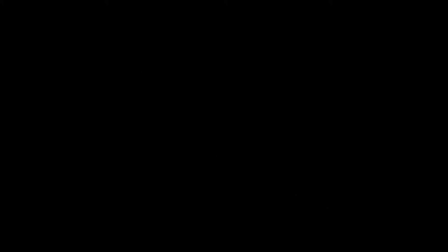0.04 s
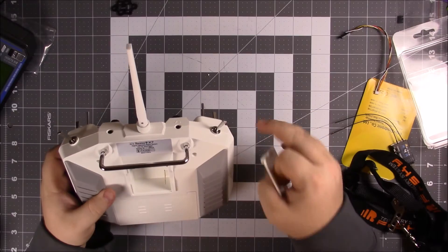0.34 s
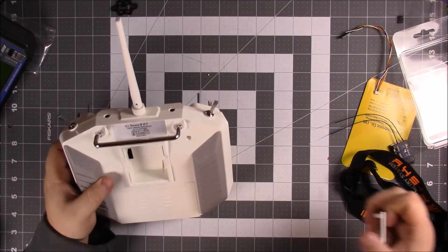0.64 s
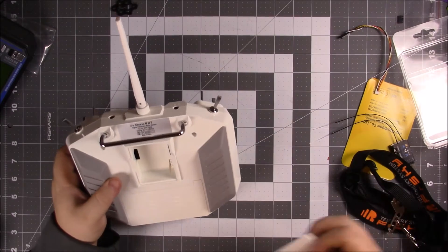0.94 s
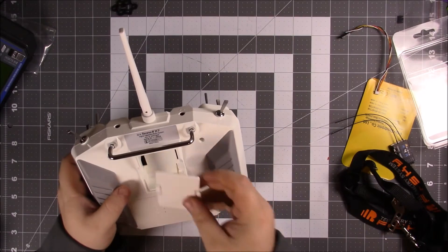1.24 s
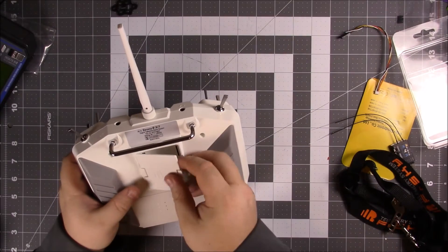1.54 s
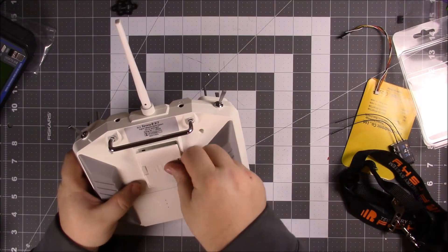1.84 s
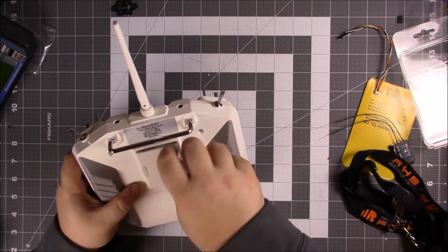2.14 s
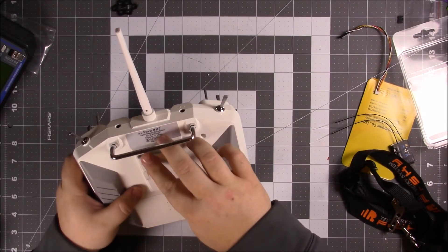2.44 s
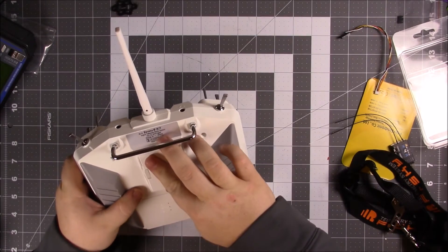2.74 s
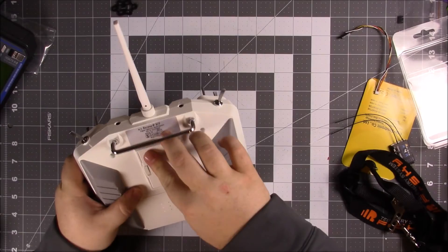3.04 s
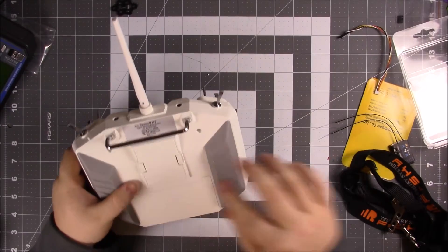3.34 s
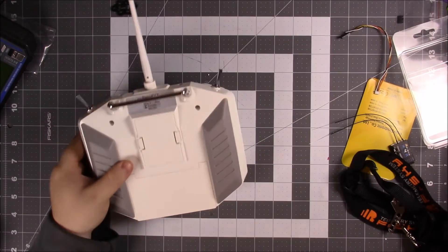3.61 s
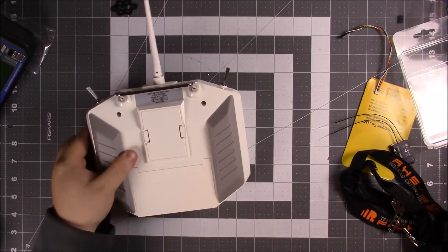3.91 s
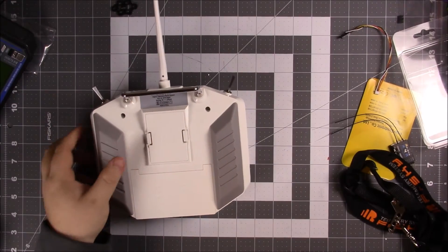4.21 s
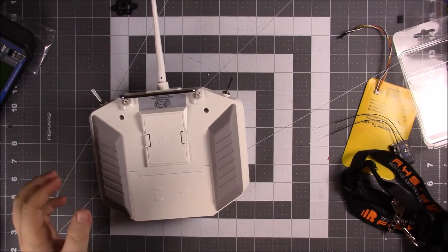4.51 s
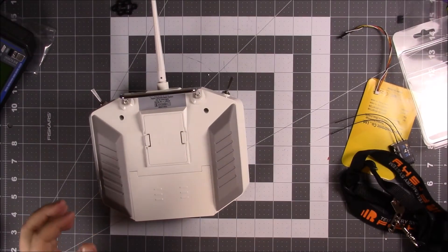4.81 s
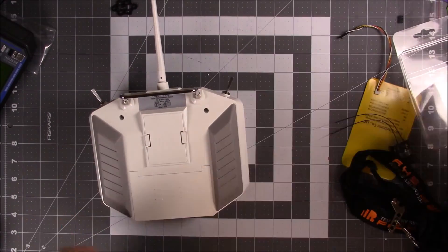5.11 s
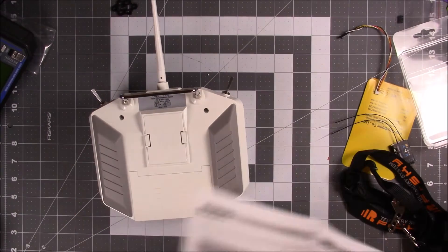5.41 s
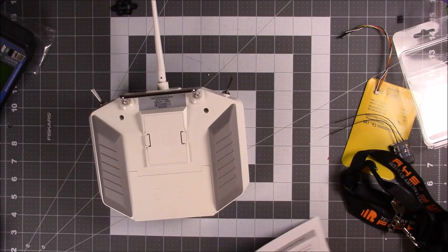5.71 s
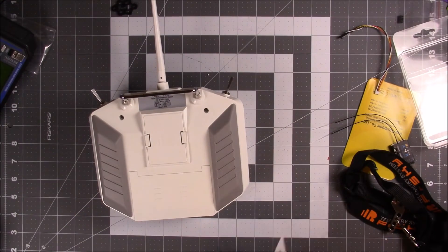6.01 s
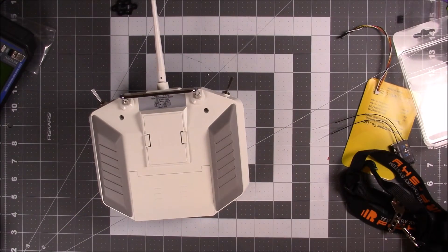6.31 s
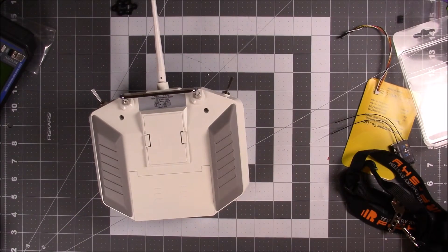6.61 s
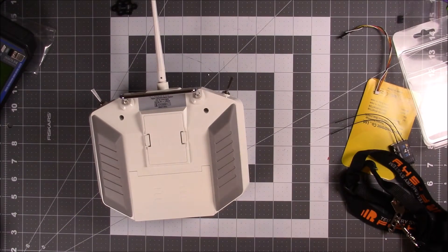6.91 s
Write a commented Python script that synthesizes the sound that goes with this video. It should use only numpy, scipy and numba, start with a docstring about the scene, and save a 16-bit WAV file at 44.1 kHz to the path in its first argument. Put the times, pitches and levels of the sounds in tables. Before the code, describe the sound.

Light plastic taps lead to one loud rattling snap, then soft knocks, a sleeve swish and crinkling packaging in a humming room.

```python
"""A plastic cover snaps home in the back of a handheld radio case, after tapping and catching.
Each impact excites the damped modes of panel, shell and cavity; loose parts rattle after the snap.
The case settles on a table mat, a sleeve slides away with friction noise, and a thin plastic package
buckles and crackles as it is picked up. Mains hum and a fan fill the small room.
One close stereo microphone feeds a fast limiter."""
import sys
import numpy as np
from scipy import signal
from scipy.fft import rfft, irfft, next_fast_len
from scipy.io import wavfile
from scipy.ndimage import uniform_filter1d, minimum_filter1d
from numba import njit

SR = 44100
rng = np.random.default_rng(int(sys.argv[2]) if len(sys.argv) > 2 else 0)


def transcribe(signal):
    """Save signal, clipped to [-1, 1], as a 16-bit WAV file at the path in sys.argv[1]."""
    frames = np.atleast_2d(signal).T
    limited = np.clip(frames, -1, 1)
    pcm = np.round(limited * 32767).astype(np.int16)
    wavfile.write(sys.argv[1], SR, pcm)


N = 315403
TIME = np.arange(N) / SR
BLOW_TIME = np.arange(8192) / SR


# modes of the hollow case and its metal parts: (frequency [Hz], bandwidth [Hz], gain [dB])
HOLLOW_MODES = [(379, 19, 7), (430, 5.3, -2.5), (466, 17, 3), (518, 8, 1.5), (645, 9.4, -1.5),
                (753, 12, -13.5), (1292, 22, -12.5), (1592, 14, -15.5), (255, 22, -6), (3890, 32, -1),
                (7200, 45, -17), (13800, 60, -16)]
# impacts of loose parts inside: (time [s], knock [dB], buzz [dB], chatter [dB])
LOOSE_PARTS = [(3.0956, -16, -41, -35), (3.1085, -21.5, -24, -34), (3.1145, -22.5, -24, -28),
               (3.121, -23, -27.5, -24), (3.127, -20, -36, -25), (3.137, -26, -45, -32.5)]

def snap(latch_s=3.0821, latch_ms=1.1):
    """Impulse excitation: the latch cracks home, the hollow case rings freely and loose parts rattle."""
    out = np.zeros(N)
    add(out, latch_s, case_blow(panel_hz=467, ping_hz=3560, thud_db=-14.5, clack_db=-11.5, tick_db=-15,
                                ms=latch_ms, ping_db=-12.5, wall_db=-26))
    ring = resonate(np.pad(contact(0.15), (0, SR // 3)), HOLLOW_MODES)
    crack = band(contact(latch_ms), 12000, 18000)
    add(out, latch_s, burst(ring, -15))
    add(out, latch_s, burst(crack, -21))
    for s, knock_db, buzz_db, chatter_db in LOOSE_PARTS:
        force = contact(1.5)
        knock = band(resonate(force, [(470, 50, -2), (634, 44, -8.5), (752, 45, -7.5)]), 320, 1700)
        buzz = band(resonate(force, [(3890, 130, 0)]), 3000, 5000, order=1)
        shell = dense_modes(force, 0.071) + unit(resonate(force, SHELL_MODES))
        chatter = band(shell, 1600, 3100, order=1)
        add(out, s, burst(knock, knock_db) + burst(buzz, buzz_db) + burst(chatter, chatter_db))
    return out


# impacts of the cover on the case: (time [s], panel pitch [Hz], edge ping [Hz], thud [dB], clack [dB],
# tick [dB], contact time [ms], ping [dB], back wall [dB])
COVER_TAPS = [(1.4133, 582, 3560, -33, -34, -44.5, 1.5, -39, -35),
              (1.517, 566, 1480, -41, -58, -71, 1.2, -62, -47),
              (1.5552, 580, 2770, -34, -43, -62, 0.34, -43.5, -43),
              (1.556, 406, 3500, -41, -47, -69, .5, -43.5, -50),
              (1.577, 530, 1570, -40, -49, -62, 3.6, -55, -44.5),
              (1.6488, 560, 8700, -32, -36, -43, 1.35, -40, -41),
              (1.801, 410, 1120, -38, -46.5, -62, 6, -51, -45.5),
              (1.824, 427, 4400, -37, -48, -66, 1.66, -54.5, -45),
              (1.84, 393, 3200, -34.5, -52, -72, 2, -58, -50),
              (1.907, 550, 3220, -45.5, -55, -70, 2.2, -53, -55),
              (2.135, 420, 8000, -41.5, -50.5, -55.5, 7.7, -66, -54),
              (2.203, 543, 8750, -36, -42, -49, 1.27, -46, -48),
              (2.2109, 448, 1590, -39.5, -44, -53, 0.56, -50, -49),
              (2.586, 445, 1400, -45, -67, -80, 1.04, -66, -62),
              (2.707, 434, 1750, -36, -49, -71, 4.8, -42, -39),
              (2.715, 373, 3220, -29.5, -30.5, -37, 0.62, -29.5, -27),
              (2.808, 377, 1530, -37, -34, -53, 0.91, -36, -38),
              (2.8108, 385, 4425, -25, -28, -40.5, 0.8, -36.5, -28.5),
              (2.9049, 398, 1330, -35, -54, -82, 0.62, -56, -57)]

def taps(cavity_hz=385, detune_db_per_octave=10):
    """Coupled resonance: the cover taps, and the enclosed air answers most to a panel near its pitch."""
    out = np.zeros(N)
    for s, panel_hz, ping_hz, thud_db, *blow in COVER_TAPS:
        add(out, s, case_blow(panel_hz, ping_hz, thud_db, *blow))
        coupling_db = -9 - detune_db_per_octave * abs(np.log2(panel_hz / cavity_hz))
        cavity = band(resonate(contact(0.18), [(cavity_hz, 40, 0)]), 340, 470)
        add(out, s, burst(cavity, thud_db + coupling_db))
    return near_reflection(out)


# modes of the case's shell: (frequency [Hz], bandwidth [Hz], gain [dB])
SHELL_MODES = [(962, 22, 3), (1125, 60, 0.5), (1306, 56, 3.5), (1621, 84, 2.5), (2026, 99, -5.5),
               (2697, 210, -3.5), (3080, 360, -4), (3520, 610, -3), (5680, 300, -7), (5980, 100, 1),
               (7300, 880, -1.5), (8900, 250, 0.5), (10200, 300, 0)]
# modes of its back wall: (frequency [Hz], bandwidth [Hz], gain [dB])
BACK_WALL_MODES = [(747, 57, 3), (936, 40, 0), (1091, 55, -2), (1325, 37, -5), (1642, 55, -13)]

def case_blow(panel_hz, ping_hz, thud_db, clack_db, tick_db, ms, ping_db, wall_db):
    """Modal superposition: the panel thuds, wall rings, edge pings, shell clacks and contact ticks."""
    force = contact(ms)
    panel = unit(resonate(force, [(panel_hz, 48, 0), (panel_hz * 1.446, 110, -7)]))
    body = unit(band(dense_modes(force, 0.23), 180, 800, order=1))
    shell = unit(resonate(force, SHELL_MODES)) + undb(-5) * dense_modes(force, 0.075)
    shell += undb(-9) * unit(force)
    ping = band(resonate(force, [(ping_hz, 260, 0)]), 0.8 * ping_hz, 1.2 * ping_hz, order=1)
    wall = band(resonate(force, BACK_WALL_MODES), 660, 2600)
    thud = band(panel + undb(-6) * body, 0.55 * panel_hz, 1200)
    # a blow with little tick is soft, so its clack is dull too
    cutoff_hz = np.clip(8000 * 2 ** ((tick_db - clack_db) / 14), 1500, 12000)
    clack = band(band(shell, 1050, 4900, order=3), 100, cutoff_hz)
    tick = band(shell, 5200, 17000)
    return (burst(thud, thud_db) + burst(wall, wall_db) + burst(clack, clack_db)
            + burst(ping, ping_db) + burst(tick, tick_db))


# impacts on the mat: (time [s], panel pitch [Hz], thud [dB], clack [dB], table [dB], contact time [ms])
MAT_KNOCKS = [(3.7414, 267, -35, -45.5, -40.5, 0.5), (3.7791, 315, -41.5, -46, -46, 0.9),
              (3.785, 520, -41.5, -49, -56, 2.8), (3.988, 278, -44, -51, -51, 0.73),
              (4.006, 272, -43, -48, -42, 1.36), (4.044, 237, -40, -62, -43.5, 2.04),
              (4.058, 169, -46, -60, -43, 1.5), (4.128, 253, -42.5, -51.5, -51, 2.7),
              (4.3377, 336, -50, -45.5, -61, 0.43), (4.442, 348, -55, -51, -70, 0.69)]
# modes of the table: (frequency [Hz], bandwidth [Hz], gain [dB])
TABLE_MODES = [(91, 20, -4), (154.4, 11.3, 3), (244, 30, -8.5), (537, 28, -7)]

def settling():
    """Structure-borne sound: the case rocks on the soft mat and drives the table's low modes."""
    out = np.zeros(N)
    for s, panel_hz, thud_db, clack_db, table_db, ms in MAT_KNOCKS:
        add(out, s, case_blow(panel_hz, ping_hz=1490, thud_db=thud_db, clack_db=clack_db, ms=ms,
                              tick_db=clack_db - 26.5, ping_db=clack_db - 1, wall_db=clack_db - 7))
        thump = band(resonate(contact(ms), TABLE_MODES), 60, 880)
        add(out, s, burst(thump, table_db))
    return out


# buckles of the package: (time [s], facet pitch [Hz], clack [dB], tick over clack [dB], contact time [ms])
BUCKLES = [(4.783, 1510, -46.5, -16, 7), (5.177, 1260, -34, -9, 2.1), (5.188, 3720, -33, -14.5, 2.06),
           (5.5575, 1900, -44, -4, .8), (5.566, 1900, -36.5, -27, 4), (5.576, 1800, -34, -31, 1.5),
           (5.585, 2290, -42, -1.5, 3.3), (5.679, 2760, -42, -9, 1.5), (5.691, 1680, -34.5, -25, 1.3),
           (5.708, 2600, -44, -2.5, 0.71), (5.7135, 2450, -32.5, -13, 0.35), (5.745, 3050, -23.5, -5, 0.2),
           (5.809, 970, -40.5, -28, 1.2), (5.816, 1290, -41.5, -17, 2), (5.968, 3970, -46, -6.5, 2.1),
           (6.053, 3630, -48, 0.5, 0.15), (6.1147, 3500, -53, 1, 0.8), (6.2238, 3680, -50, 2, 0.35),
           (6.2518, 3500, -42, 1, 3), (6.2666, 3370, -43, 5.5, 0.62), (6.2807, 3400, -32, 1, 0.49),
           (6.284, 2240, -34.5, -9, 3.5), (6.628, 2100, -47.5, -8.5, 1.8), (6.99, 1960, -47, -23.5, 1.7),
           (7.006, 2070, -46, -24.5, 1.5), (7.136, 3860, -47, -13, 0.58)]
# modes of its thin wall: (frequency [Hz], bandwidth [Hz], gain [dB])
PACKAGE_MODES = [(656, 88, 4), (972, 48, 12), (1118, 38, 5.5), (1350, 83, 8), (1583, 27, -3.5),
                 (2580, 140, 2), (4070, 140, -3), (4900, 600, 3), (6940, 1400, 12.5), (9380, 260, 1.5),
                 (12000, 3600, 12)]

def buckling():
    """Snap-through buckling: each facet of the package flips and pings; the damped wall dies at once."""
    out = np.zeros(N)
    for s, facet_hz, clack_db, bright_db, ms in BUCKLES:
        force = contact(ms)
        wall = unit(resonate(force, PACKAGE_MODES)) + undb(-1) * dense_modes(force, 0.038)
        wall += undb(-3) * unit(force)
        facet = unit(band(force, facet_hz - 225, facet_hz + 225))
        clack = unit(band(wall, 950, 5200, order=3)) + undb(-3) * facet
        thud = band(wall, 420, 1003)
        thud_db = clack_db - 8.5 - 0.2 * bright_db + 2.5 * np.log2(ms)  # duller, longer pushes thud more
        tick = band(wall, 6800, 11700)
        add(out, s, burst(thud, thud_db) + burst(clack, clack_db) + burst(tick, clack_db + bright_db))
    return out


# the package is dragged and turned: (peak time [s], swell [s], fade [s], scrape gain [dB], hiss gain [dB])
DRAGS = [(5.3, 0.11, 0.28, -53.5, -56), (5.405, 0.038, 0.1, -45, -46.5), (5.57, 0.056, 0.054, -40, -43),
         (5.685, 0.056, 0.075, -39, -42), (5.795, 0.039, 0.1, -36.5, -44.5),
         (5.99, 0.091, 0.095, -59, -51.5), (6.165, 0.076, 0.022, -50, -47.5),
         (6.28, 0.021, 0.033, -37.5, -39), (6.655, 0.042, 0.14, -51.5, -50.5),
         (6.99, 0.021, 0.021, -43, -52), (7.12, 0.071, 0.03, -68, -50)]
# dull and bright friction spectra, shared with the sleeve: (frequency [Hz], relative level [dB])
SCRAPE_SPECTRUM = [(40, -32), (130, -33), (250, -3.5), (450, -5.5), (800, -3.5), (1500, 0), (2400, -5),
                   (3400, -10.5), (6000, -49)]
HISS_SPECTRUM = [(1500, -33), (2700, 1.5), (3500, 0), (4400, -2), (5300, -4), (7000, -7), (8800, -9),
                 (11500, -10.5), (14000, -19), (16000, -29)]

def dragging():
    """Forced vibration: friction drives the package wall while the smooth plastic hisses and crackles."""
    scrape_gain, hiss_gain = strokes(DRAGS)
    slips = friction(SCRAPE_SPECTRUM, grain_db=3, uneven_db=2, patchy_db=3)
    scrape = undb(-4) * slips + undb(-5) * unit(resonate(slips, PACKAGE_MODES))
    hiss = friction(HISS_SPECTRUM, grain_db=1, uneven_db=2.6, patchy_db=1.5)
    sheen = friction([(2000, -20.5), (5000, 7), (11000, -10), (16000, -7)],
                     grain_db=-2, uneven_db=6, patchy_db=-1.5)
    treble = undb(-1) * hiss + undb(-9) * sheen + undb(-16.5) * crackle()
    return scrape * scrape_gain + treble * hiss_gain


def crackle(buckles_per_s=180):
    """Poisson process: tiny buckles of equal strength excite the package wall at random times."""
    clicks = (rng.random(N) < buckles_per_s / SR).astype(float)
    force = signal.fftconvolve(clicks, contact(0.46))[:N]
    return unit(band(unit(force) + 0.35 * unit(resonate(force, PACKAGE_MODES)), 1500, 14500))


# strokes of the sleeve on the mat: (peak time [s], swell [s], fade [s], scrape [dB], hiss [dB])
SLEEVE_SLIDES = [(4.01, 0.12, 0.086, -59, -61.5), (4.15, 0.084, 0.042, -55, -54),
                 (4.31, 0.086, 0.076, -53, -55), (4.565, 0.077, 0.09, -47.5, -45),
                 (4.73, 0.089, 0.1, -51, -55), (4.96, 0.13, 0.14, -49.5, -54.5),
                 (5.105, 0.069, 0.024, -41.5, -41.5)]

def sleeve(speed_up_s=4.65, rise_hz_per_s=5100):
    """Sliding friction: cloth scrapes and hisses, and its weave whistles higher as the arm speeds up."""
    scrape_gain, hiss_gain = strokes(SLEEVE_SLIDES)
    scrape = friction(SCRAPE_SPECTRUM, grain_db=1.5, uneven_db=3, patchy_db=2.5) * scrape_gain
    hiss = friction(HISS_SPECTRUM, grain_db=1.5, uneven_db=3.5, patchy_db=2) * hiss_gain
    weave_hz = 6800 + rise_hz_per_s * np.clip(TIME - speed_up_s, 0, 0.42)
    whistle = weave(weave_hz, width_hz=2400) * undb(-5.5) * hiss_gain
    pressure = hiss_gain / hiss_gain.max()  # the ribbed cuff rasps only under pressure
    cuff_rasp = weave(4070, width_hz=1200) * undb(-40) * pressure ** 1.6
    return scrape + hiss + whistle + cuff_rasp


def weave(hz, width_hz):
    """Narrow-band noise: threads flick past an edge at a rate set by the speed of the cloth."""
    spread = unit(band(rng.standard_normal(N), 5.6, width_hz / 2))
    phase = 2 * np.pi * np.cumsum(hz * np.ones(N)) / SR
    return spread * np.sqrt(2) * np.cos(phase)


# fingers rub the cover: (peak time [s], swell [s], fade [s], level [dB])
SKIN_RUBS = [(.25, 0.075, 0.037, -54.5), (.52, 0.045, 0.035, -53.5), (.97, 0.037, 0.15, -56),
             (1.84, 0.085, 0.017, -56), (2.25, 0.012, .04, -54), (2.41, 0.027, 0.016, -56.5)]
# plastic creaks between the fingers: (time [s], pitch [Hz], level [dB], contact time [ms])
CREAKS = [(0.303, 7200, -50, 7.8), (0.866, 7660, -54, 2.7), (0.944, 11000, -58, 4),
          (1.174, 12000, -61, 1.6), (3.935, 3800, -58, 2)]

def fingers():
    """Friction and resonance: skin brushes the small cover, which creaks faintly now and then."""
    rub = friction([(1500, -6), (4000, -6.5), (7000, -10.5), (12000, -12.5), (16000, -30)],
                   grain_db=1.5, uneven_db=3, patchy_db=2.5)
    out = rub * strokes(SKIN_RUBS)[0]
    for s, hz, db, ms in CREAKS:
        force = dense_modes(contact(ms), 0.048)
        creak = force + unit(resonate(force, [(hz, 600, 0)]))
        add(out, s, burst(band(creak, 2000, 14000), db))
    return out


def near_reflection(x, delay_s=0.003012):
    """Comb filtering: a hard surface close by returns a duller echo, which hollows the tone."""
    out = x.copy()
    add(out, delay_s, undb(-10.5) * band(x, 40, 2500, order=1))
    return out


def room(x, wet_db=-12, low_t60=0.28, high_t60=0.19, first_echo_s=0.009):
    """Reverberation: the walls of a small room add a diffuse tail, weaker and shorter in the treble."""
    t = TIME[:SR // 2]
    low, high = rng.standard_normal((2, len(t)))
    tail = band(low, 120, 6500) * decay(t, low_t60)
    tail += undb(-5) * band(high, 7100, SR / 2) * decay(t, high_t60)
    onset = np.clip(t / first_echo_s - 1, 0, 1)
    tail *= onset / np.sqrt(np.sum(decay(t, low_t60) ** 2))
    return x + undb(wet_db) * signal.fftconvolve(x, tail)[:N]


# spectrum of the fan's air noise: (frequency [Hz], relative level [dB])
AIR_SPECTRUM = [(22, -42.5), (45, -13), (90, -4.5), (160, -2), (300, -0.5), (500, -1.5), (800, -5),
                (1150, -8.5), (1650, -13), (2000, -10.5), (2500, -16.5), (4000, -21), (8000, -26.5),
                (16000, -36.5)]
# tones of mains and fan motor: (frequency [Hz], rms level [dB])
HUM_TONES = [(60, -64.5), (120, -58), (155.3, -72.5), (620.6, -75.5), (776.2, -64), (1183, -70),
             (1317, -73)]

def fan_and_mains():
    """Line spectrum over broadband noise: mains hum and motor tones sound above the fan's moving air."""
    out = colour(rng.standard_normal(N), AIR_SPECTRUM) * undb(-52.5 + 0.99 * drift(5))
    for hz, db in HUM_TONES:
        waver = min(hz / 800, 1)  # the higher tones waver more
        amplitude = np.sqrt(2) * undb(db + 1.5 * waver * drift(3.8))
        out += amplitude * np.sin(2 * np.pi * hz * TIME + 1.3 * waver * drift(2.4))
    return out


def contact(ms):
    """Broadband excitation: a flurry of tiny slips swells and dies, with a nearly flat spectrum."""
    age = BLOW_TIME * 1000 / ms
    envelope = age * np.exp(-age)
    force = rng.standard_normal(len(BLOW_TIME)) * envelope
    for _ in range(4):  # flatten the spectrum, then confine the force in time again
        spectrum = rfft(force)
        force = irfft(spectrum / (np.abs(spectrum) + 1e-12)) * envelope ** (1 / 3)
    return force


def resonate(x, modes):
    """Modal response: x drives resonances of alternating sign, each (frequency, bandwidth, gain)."""
    return sum((-1) ** k * undb(db) * signal.lfilter(*signal.iirpeak(hz, hz / width, SR), x)
               for k, (hz, width, db) in enumerate(modes))


def dense_modes(force, t60):
    """Modal overlap: the countless modes of a plastic wall respond like a decaying noise."""
    response = rng.standard_normal(len(BLOW_TIME)) * decay(BLOW_TIME, t60)
    return unit(signal.fftconvolve(force, response)[:len(BLOW_TIME)])


def friction(spectrum, grain_db, uneven_db, patchy_db):
    """Friction noise: dense slips under wavering pressure favour now one pitch, now another."""
    slips = rng.standard_normal(N) * undb(grain_db * drift(900) + uneven_db * drift(70))
    cells = signal.stft(slips, nperseg=512)[2]
    patches = uniform_filter1d(rng.standard_normal(cells.shape), size=5, axis=0)  # smooth in frequency
    patches = unit(uniform_filter1d(patches, size=6, axis=1))  # and in time
    return colour(signal.istft(cells * undb(patchy_db * patches))[1][:N], spectrum)


def strokes(rows):
    """Incoherent addition: bell-shaped strokes sum in power, giving one envelope per level column."""
    power = 0
    for s, swell_s, fade_s, *db in rows:
        from_peak = (TIME - s) / np.where(TIME < s, swell_s, fade_s)
        bell = np.exp(-np.minimum(from_peak ** 2, 20))
        power = power + np.outer(undb(db), bell) ** 2
    return np.sqrt(power)


def colour(x, spectrum):
    """Spectral shaping: filter x by (frequency [Hz], level [dB]) points and scale to rms 1."""
    hz, db = np.transpose(spectrum)
    size = next_fast_len(N)
    bin_hz = np.maximum(np.arange(size // 2 + 1) * SR / size, 1)
    gain = undb(np.interp(np.log(bin_hz), np.log(hz), db))
    return unit(irfft(rfft(x, size) * gain, size)[:N])


def band(x, lo_hz, hi_hz, order=2):
    """Causal band-pass filtering."""
    sos = signal.butter(order, [lo_hz, min(hi_hz, SR * 0.48)], "band", fs=SR, output="sos")
    return signal.sosfilt(sos, x)


def drift(rate_hz):
    """Random modulation at rms 1."""
    step = int(SR / rate_hz)
    held = np.repeat(rng.standard_normal(N // step + 1), step)
    return unit(uniform_filter1d(held, step)[:N])


def decay(t, t60):
    """Exponential decay by 60 dB in t60 seconds."""
    return undb(-60 * t / t60)


def burst(x, db):
    """Equivalent level: scale a blow so that its energy, spread over 20 ms, has this level."""
    return x * undb(db) * np.sqrt(SR / 50 / np.sum(x ** 2))


def unit(x):
    """Normalisation to rms 1."""
    return x / np.sqrt(np.mean(x ** 2))


def undb(db):
    """Amplitude ratio from decibels."""
    return 10 ** (np.asarray(db) / 20)


def add(out, s, x):
    """Superposition of x on out at time s."""
    start = int(s * SR)
    out[start:start + len(x)] += x[:N - start]


def scene():
    """Mid-side stereo: the sources lie in front; treble, sleeve and room differ a little at the sides."""
    cloth = sleeve()
    near = taps() + snap() + settling() + buckling() + dragging() + cloth + fingers()
    in_room = room(near)
    mid = in_room + fan_and_mains()
    side = undb(-15) * (in_room - near) + undb(-22) * cloth  # the sleeve is a little left of centre
    side += undb(-70) * colour(rng.standard_normal(N), AIR_SPECTRUM)
    # the microphone's two ports differ a little in phase and level
    high_pass = signal.butter(1, 2500, "high", fs=SR, output="sos")
    treble = signal.hilbert(signal.sosfiltfilt(high_pass, near), next_fast_len(N))[:N]
    side += undb(-19) * treble.imag - undb(-31) * treble.real
    return np.array([mid + side, mid - side])


@njit
def follow_peaks(x, release):
    """Envelope detection: instant rise, exponential fall."""
    out, envelope = np.empty(len(x)), 0.
    for i in range(len(x)):
        envelope = max(x[i], envelope * release)
        out[i] = envelope
    return out


def record(dry, ceiling_db=1.0, release_s=0.058, open_s=0.16):
    """Peak limiting: the input opens, the gain ducks at the snap and recovers; both band ends are cut."""
    peak = follow_peaks(np.abs(dry).max(axis=0), np.exp(-1 / (release_s * SR)))
    gain = np.minimum(1, undb(ceiling_db) / (peak + 1e-9))
    gain = uniform_filter1d(minimum_filter1d(gain, size=65), size=65)
    opening = np.clip((TIME - open_s) / 0.0062, 0, 1)
    high_pass = signal.butter(2, 35, "high", fs=SR, output="sos")
    low_pass = signal.ellip(8, 0.2, 70, 15750, fs=SR, output="sos")
    return signal.sosfilt(low_pass, signal.sosfilt(high_pass, dry * gain * opening))


dry = scene()
out = record(dry)
transcribe(out)
```